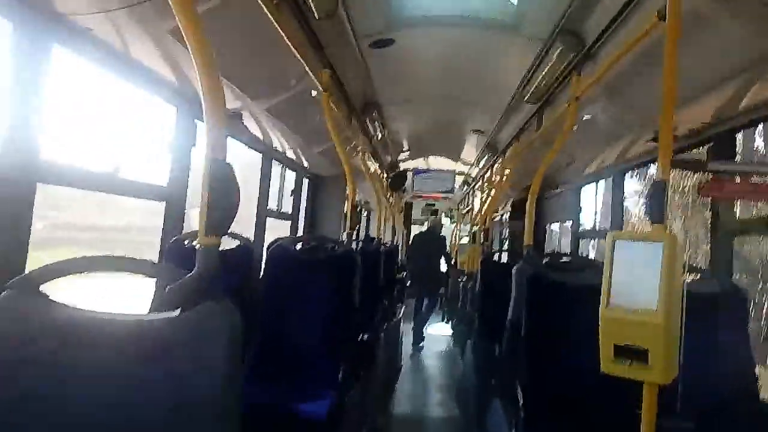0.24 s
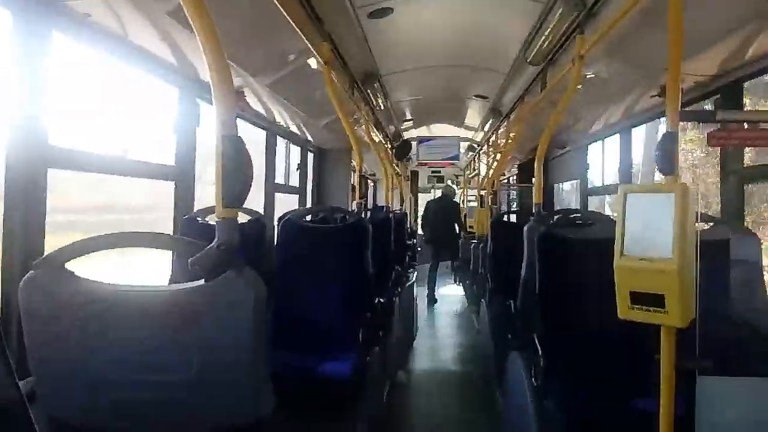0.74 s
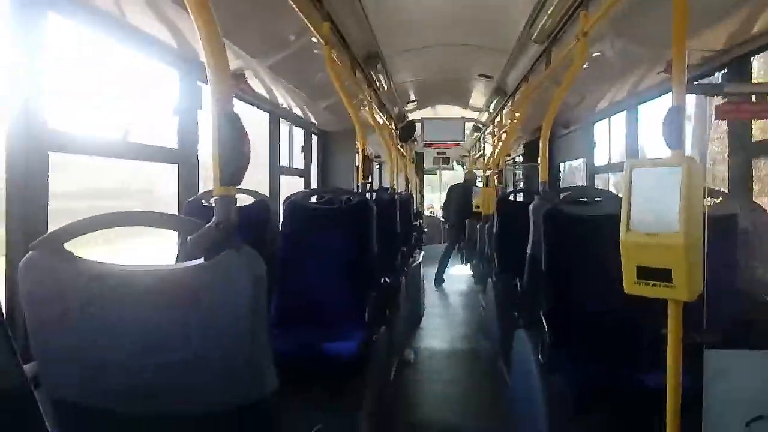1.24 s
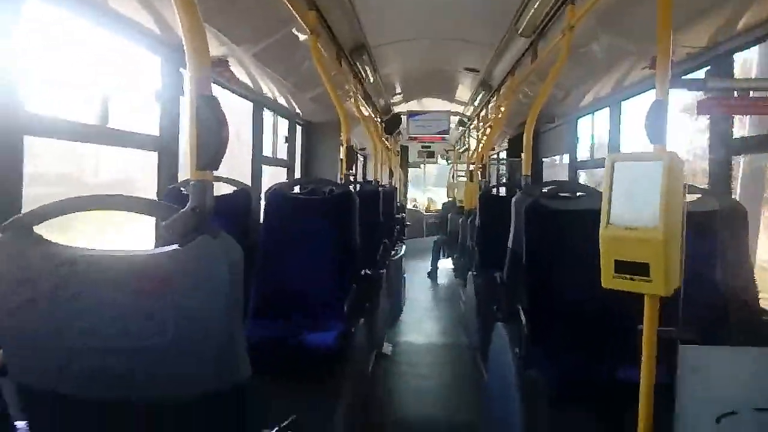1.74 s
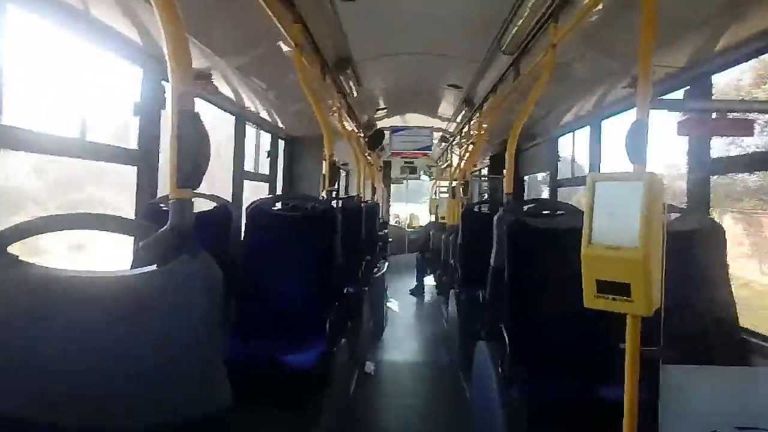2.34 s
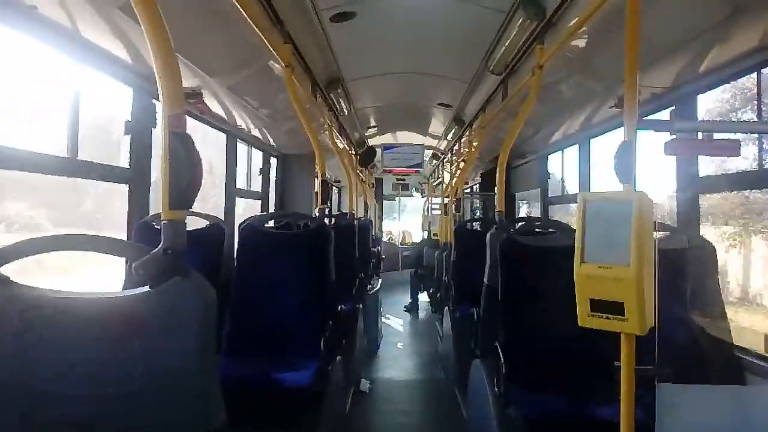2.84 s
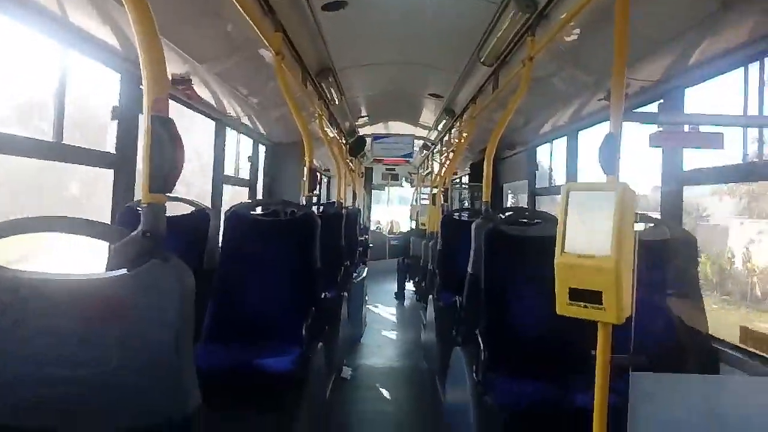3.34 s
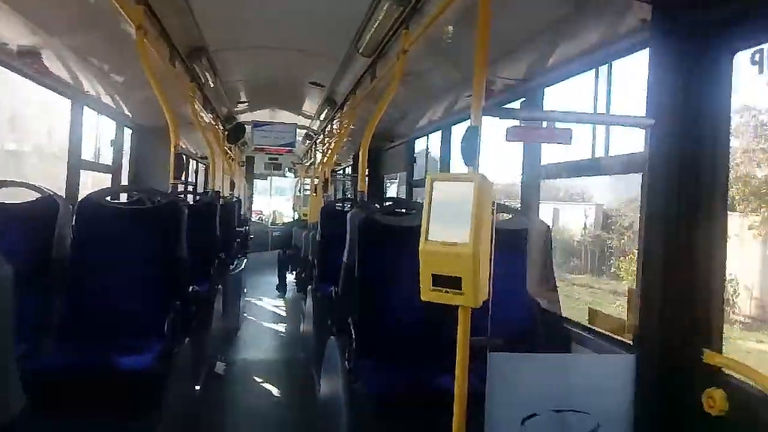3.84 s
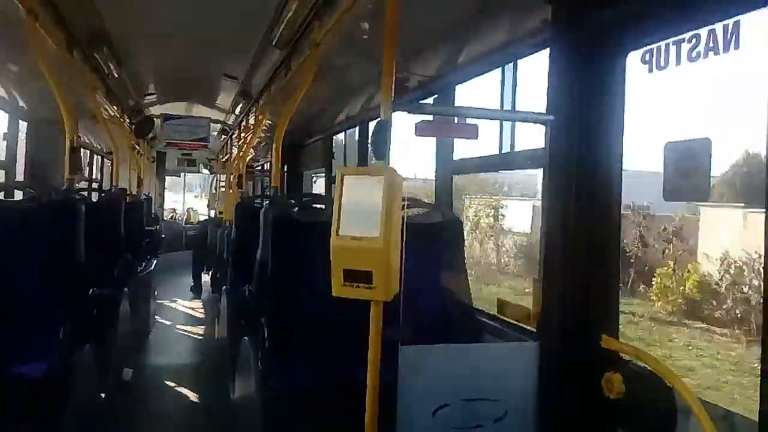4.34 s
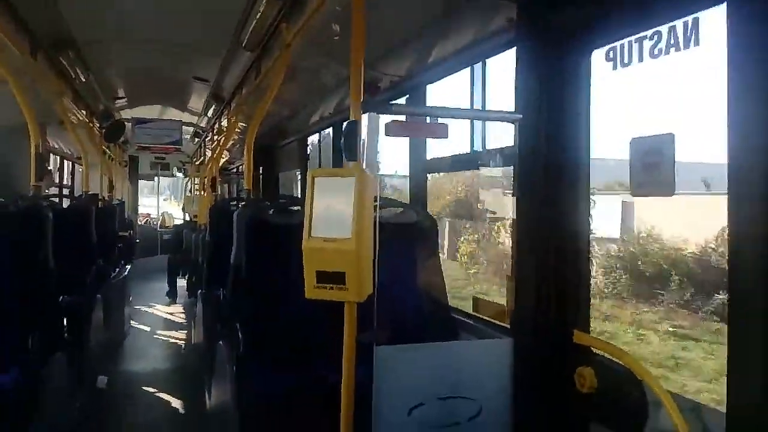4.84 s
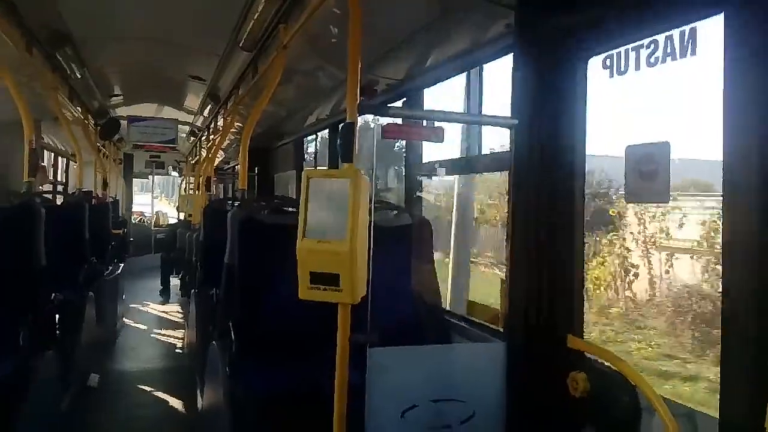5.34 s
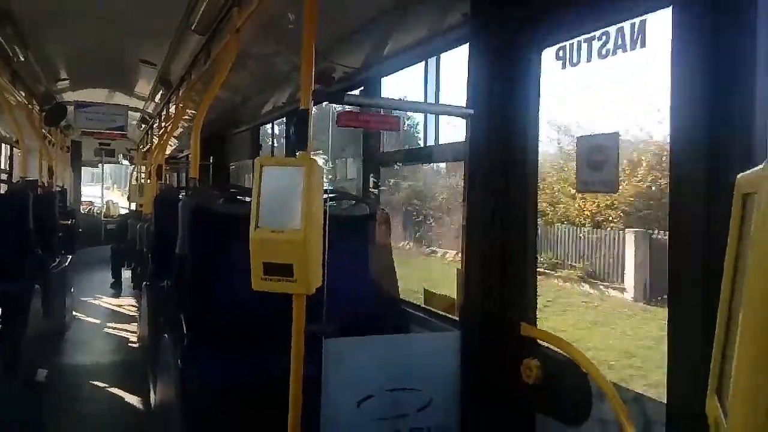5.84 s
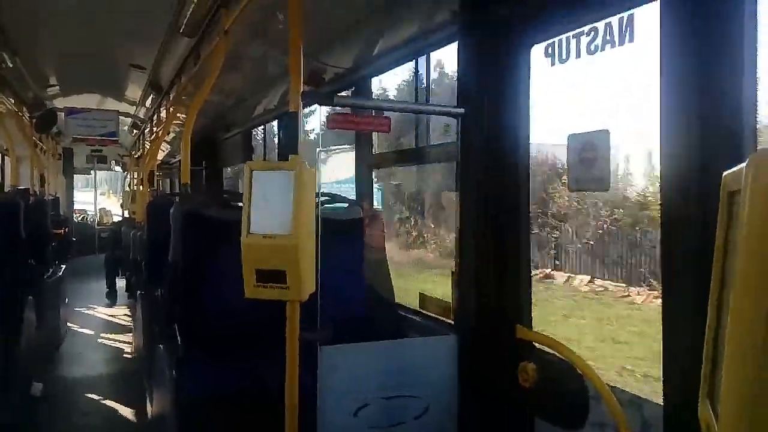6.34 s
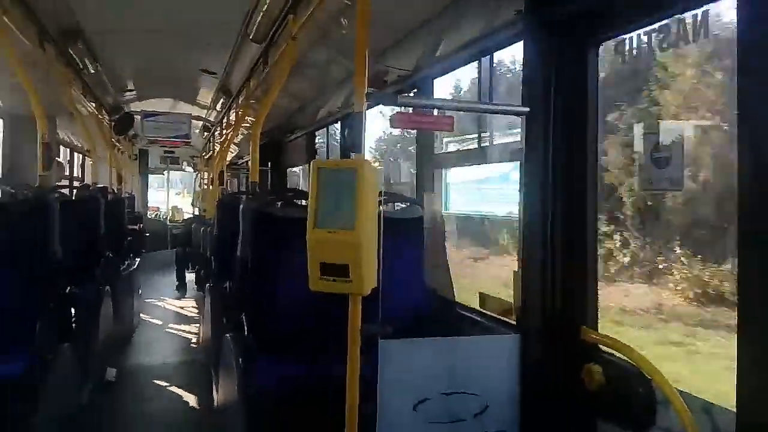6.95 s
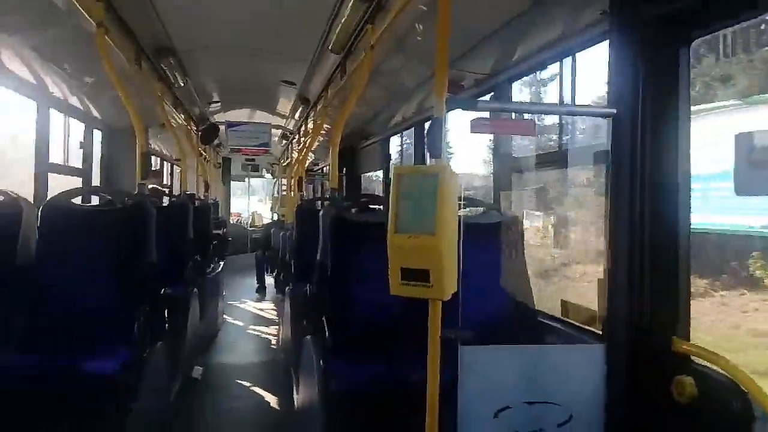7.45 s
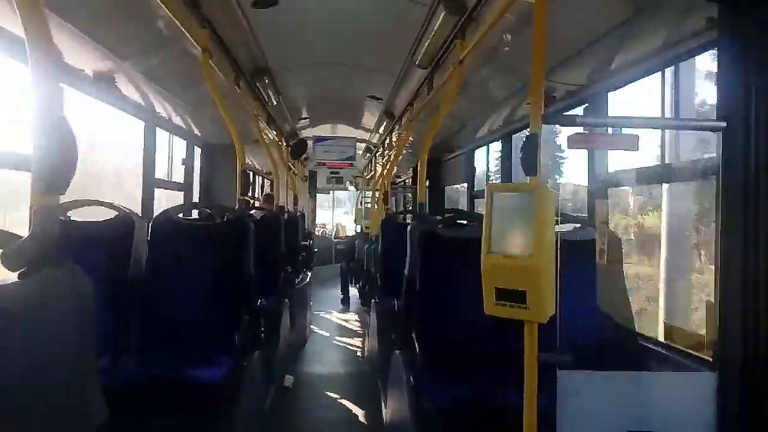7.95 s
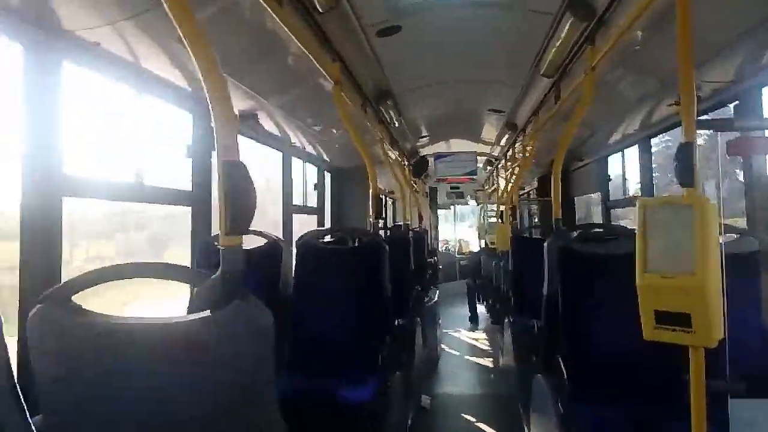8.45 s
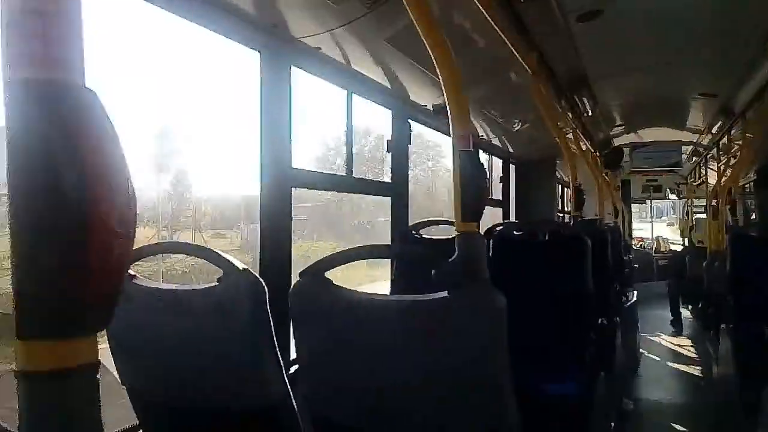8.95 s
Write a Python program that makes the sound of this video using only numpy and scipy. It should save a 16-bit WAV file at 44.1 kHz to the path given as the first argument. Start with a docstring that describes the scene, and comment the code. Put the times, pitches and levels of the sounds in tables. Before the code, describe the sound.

Interior of a nearly empty electric bus, heard in stereo from a rear seat. From 0 to 2 s, low thuds, loose panel rattles and road bumps come close together, with sharp airy valve puffs, strongest around 0.5 s. From about 1.1 s a low gear whine swells to dominate by 1.4 s: two close tones beating roughly, rising from about 140 Hz towards 300 Hz, fast until about 5 s, then slowly. Thinner overtones climb with it, wavering between 3 and 5 s. Low body drumming, tyre and wind roar, and weak blower and pump tones run throughout. A short puff comes at 3.3 s. A faint door-seal hiss increases from 4.3 to 7.6 s; a low hum swells near 5.7 and 6.5 s. A small rattle occurs at 6.4 s, a bump at 7.5 s, then thuds and jolts after 8.3 s as the whine continues to the end at 9.2 s.

```python
"""Inside an electric bus that gathers speed.
In the first two seconds thuds, jolts, road bumps and valve puffs crowd together. From about 1.1 s the whine
of two gear meshes, sines at 9 and 10 times the shaft rate, comes up, beats and climbs; some overtones waver
in pitch from 3 to 5 s. A door seal hisses louder from 4.3 to 7.6 s and bumps return after 8.3 s.
Throughout, shaped noise makes body drumming and tyre and wind roar; blower and pump tones are sines."""
import sys
import numpy as np
from scipy import signal
from scipy.fft import rfft, irfft, next_fast_len
from scipy.io import wavfile
from scipy.ndimage import uniform_filter1d, map_coordinates

SR = 44100
rng = np.random.default_rng(int(sys.argv[2]) if len(sys.argv) > 2 else 0)


def to_wav(s):
    """Save 16-bit WAV."""
    ch = np.atleast_2d(s).T  # columns
    pcm = np.round(np.clip(ch, -1, 1) * 32767)  # PCM
    wavfile.write(sys.argv[1], SR, pcm.astype(np.int16))


N = 405135

# drive shaft speed: (time [s], rate [turns/s])
SHAFT_RATE = [(0.0, 11.67), (0.8, 13.89), (1.5, 15.61), (2.1, 17.51), (2.7, 19.24), (3.3, 21.47),
              (3.9, 23.49), (4.5, 25.44), (4.8, 26.21), (5.1, 27.13), (5.7, 28.46), (6.0, 29.01),
              (6.3, 29.36), (7.5, 31.0), (8.4, 32.11), (9.19, 33.03)]
# torque on the gear teeth: (time [s], mesh level [dB])
LOAD = [(0, -24), (1.1, -20), (1.4, 0), (2.4, .5), (3.0, 1.5), (3.5, 1), (4.0, .5), (5.5, 0.6), (6.2, 0),
        (9.19, 0.5)]
# resonances that carry each mesh to the seat:
# (centre [Hz], width [Hz], signed rms left, right at 0 dB load [thousandths of full scale])
MESH_9_PATH = [(140.0, 12.3, -118.3, -127.1), (140.5, 33.0, 111.2, 118.8), (157.3, 2.4, 16.0, 26.0),
               (160.1, 10.8, -38.3, -42.3), (174.6, 6.7, 140.1, 154.9), (181.1, 3.3, -50.1, -46.8),
               (184.2, 2.4, 26.4, 15.7), (189.2, 6.4, 46.8, 44.4), (194.3, 4.0, 31.6, 66.3),
               (204.1, 6.2, -22.5, -27.5), (215.0, 2.4, 11.5, 11.2), (219.5, 5.1, 28.3, 31.2),
               (223.5, 3.8, 8.4, 8.9), (227.5, 3.2, 22.6, 13.2), (237.8, 3.2, 6.5, 2.1),
               (246.6, 4.6, 20.7, 13.0), (253.5, 9.8, 58.1, 57.7), (261.2, 3.5, -22.8, -27.5),
               (269.0, 3.0, 3.9, -11.8), (271.8, 4.7, 54.5, 20.5), (273.9, 6.9, 31.1, 48.9),
               (280.6, 2.8, -19.8, -9.7), (289.0, 5.6, 0.7, 3.0), (292.4, 2.8, -19.8, -13.3),
               (314.3, 29.3, 96.0, 115.8)]
MESH_10_PATH = [(161.1, 3.2, 1.7, 5.1), (167.6, 5.6, -26.1, -26.1), (181.6, 5.6, -20.9, -21.6),
                (194.0, 6.8, -38.8, -53.3), (200.1, 5.2, -13.9, -28.4), (203.6, 11.7, 88.1, 119.1),
                (217.5, 7.8, -59.5, -81.3), (224.9, 3.3, 25.6, 36.0), (232.4, 7.7, -34.4, -39.0),
                (237.9, 5.5, 21.7, 23.0), (243.8, 7.1, -30.6, -22.0), (254.2, 5.8, 9.6, -2.4),
                (257.6, 17.8, -28.2, -30.3), (275.1, 7.7, -39.9, -41.6), (279.4, 5.2, -40.9, -53.0),
                (294.6, 10.6, -50.8, -80.5), (303.6, 6.4, 25.1, 18.9), (309.6, 11.0, -8.9, -37.5),
                (316.9, 33.0, 88.8, 101.0), (318.0, 6.8, 16.1, -24.1), (325.7, 11.1, -72.0, -63.2)]
MESH_10_LEAD_CYCLES = .288   # places the beat on the shaft turn
MESH_FLUTTER_DB = .5
# overtones of the drive: [multiples of the shaft rate]
OVERTONE_ORDERS = (15, 18, 20, 27, 30, 31.5, 36)
# resonances that carry each overtone, in that order: (centre [Hz], -6 dB width [Hz], top rms [dB], L-R [dB])
OVERTONE_PATHS = [
    [(286, 12, -39, -2), (387, 20, -36.5, -1.5), (403, 20, -41, -2), (426.5, 20, -40.5, -2.5),
     (455.7, 8.5, -40.5, -10), (483.3, 16, -38, -2.5), (495, 4.8, -33.5, 2)],
    [(288, 12, -40, -1.5), (515, 36, -40.5, -0.5), (500, 18, -50.5, -0.5), (550.5, 23, -40, -2.5),
     (586, 9.1, -43.5, -6.5)],
    [(313, 27, -45.5, 4), (385, 17, -53, -3.5), (410, 50, -47.5, -0.5), (490, 18, -49, -5),
     (597, 17, -48.5, -3.5), (634.5, 31, -40.5, 2)],
    [(600, 26, -42.5, -4), (635, 63, -44.5, 1.5), (695, 32, -42.5, -1.5), (722, 6.3, -35, -2.5),
     (783, 12, -40.5, 3.5), (852, 49, -43.5, 1)],
    [(508, 35, -43.5, 0), (565, 55, -42.5, 1.5), (640, 20, -43, -3), (694, 24, -41.5, 3),
     (726, 22, -45, 1.5), (825, 16, -46.5, -3.5), (917, 16, -47, -5.5)],
    [(520, 77, -54, -3.5)],
    [(530, 21, -56, -1.5), (746, 30, -47, 0), (840, 54, -43, 2), (965, 17, -47, -1.5)],
]
OVERTONE_LAG_MS, OVERTONE_FLUTTER_DB_PER_ORDER = 0.14, 0.1141
# pitch waver of the first mesh's overtones under hard pull: (time [s], spread at order 27 [share of pitch])
OVERTONE_WAVER = [(0, .002), (3, .003), (3.4, .018), (4.6, .016), (5.2, .006), (5.9, .001), (9.19, .001)]

# single dull thuds through the floor: (time [s], starting amplitude [dB], pitch [Hz])
THUDS = [(0.261, -18, 111), (.352, -20, 330), (.395, -18, 220), (0.477, -8, 95), (.652, -15, 201),
         (.698, -13, 220), (.78, -20, 90), (.9, -23, 110), (1.045, -15, 170), (1.105, -23, 121),
         (1.204, -18, 170), (1.236, -15, 110), (1.611, -12, 80), (1.661, -13, 90), (7.515, -19, 120),
         (8.43, -19, 120), (8.528, -15.5, 140)]
THUD_CYCLES_PER_20_DB = 1.9

# road roughness between bumps: (time [s], drumming [dB])
ROAD = [(0, -33.5), (1.3, -34), (2.2, -32.5), (2.8, -46.5), (3.4, -33), (4, -38), (5, -33), (5.8, -36),
        (6.5, -35.5), (7.2, -34), (8, -33.5), (8.8, -44.5), (9.19, -26.5)]
# drumming spectrum: (frequency [Hz], density [dB per Hz])
DRUMMING_SPECTRUM = [(8.8, -37), (15, -6.5), (40, 0.5), (60, 6.5), (167, -2), (222, -3.5), (261, -4.5),
                     (448, -17), (499, -37), (576, -14), (665, -22.5), (728, -28), (1100, -30.5),
                     (1430, -59), (2420, -120)]
# body panel resonances: (centre [Hz], width [Hz], boost [dB])
BODY_MODES = [(68.6, 7, 3), (101.8, 2, 6.5), (164, 12, 4.5), (192, 41, 4), (222.6, 13, 7), (293, 60, 4)]
# bumps in the road: (time [s], drumming [dB], hold [s], brightness [dB])
BUMPS = [(0, -20, 0.07, 0), (0.28, -23, 0.15, 5), (0.398, -26.5, 0.17, -6), (0.571, -26, 0.12, 6),
         (0.736, -25.5, 0.19, -2.5), (1.008, -26, 0.028, 2.5), (1.109, -22, 0.083, 4.5),
         (1.295, -32, 0.029, -7), (1.612, -27, 0.063, -9), (1.846, -24, 0.11, -3.5),
         (1.99, -30.5, 0.085, -11), (2.127, -29, 0.026, -10), (2.247, -31, 0.072, -2),
         (2.558, -31.5, 0.049, -11), (2.73, -34, 0.034, -4), (2.97, -31, 0.051, -17),
         (4.13, -36, 0.035, 9.5), (4.68, -43, .03, -3), (5.13, -37.5, 0.038, 14.5), (5.607, -35, 0.033, 7),
         (7.498, -33.5, 0.076, -9), (8.39, -28, 0.044, -14), (8.5, -25.5, 0.11, 3.5), (8.66, -31, 0.1, 4),
         (8.95, -34.5, .05, -6)]
BUMP_RISE_S, BUMP_T60_S = 0.017, 0.4
ROAD_FLUTTER_DB, ROAD_BRIGHT_DB = 1.5, 1

# hard jolts that rattle the panels: (time [s], drive level [dB], length [s], brightness [dB per octave])
JOLTS = [(.3, -24, 0.11, 1.5), (.61, -34, 0.015, -21), (1.09, -25, .14, -4.5), (1.86, -36, 0.094, 2),
         (6.37, -40.5, 0.08, 2.5), (8.40, -37, 0.11, -12), (8.98, -36.5, 0.11, 0.5)]
# ringing panel modes: (pitch [Hz], relative level [dB], t60 [s])
RATTLE_MODES = [(172.4, -4.5, 0.16), (228.6, 3, 0.18), (318, -9, 0.37), (371, -4, 0.32), (445, 0, 0.085),
                (572, -5.5, 0.1), (746, -7, 0.11), (897, -8.5, 0.066)]

# tyre and wind roar: (time [s], base level [dB], treble relative to base [dB])
ROAR = [(0, -36, -5.5), (.25, -35, -8.5), (.6, -35.5, -7), (1.15, -37.5, -5), (1.5, -36.5, -6.5),
        (2.8, -37, -9), (3.4, -36.5, -8.5), (4, -36.5, -9.5), (5.3, -36, -10.5), (5.65, -33.5, -11),
        (6.4, -34, -10), (6.9, -37, -10.5), (8, -34.5, -10.5), (9.19, -36, -9.5)]
# roar spectra, low part and treble: (frequency [Hz], density [dB per Hz])
ROAR_LOW_SPECTRUM = [(190, -25), (330, 1.5), (415, -5), (505, -5.5), (679, -3.5), (953, -9.5), (1020, -6.5),
                     (1160, -8.5), (1560, -12), (1680, -10.5), (4500, -26), (5850, -55), (9900, -120)]
ROAR_TREBLE_SPECTRUM = [(1470, -14.5), (2500, -9), (2620, -4), (3410, -3), (3890, -8.5), (5120, -4),
                        (5360, -3.5), (6360, -10), (7710, -32), (10000, -57.5), (17000, -120)]
# cabin resonances: (centre [Hz], width [Hz], boost [dB])
CABIN_MODES = [(474.4, 16, 8), (795, 53, 2.5), (900, 130, 5.5), (1212, 11, 9.5), (1687, 19, 7),
               (2090, 950, 5)]
# steady drone under the floor: (frequency [Hz], density [dB per Hz])
DRONE_SPECTRUM = [(25, -4), (60, -4), (150, -3), (250, -4.5), (380, -12.5), (420, -23), (700, -41.5)]
DRONE_DB = -36

# blower and pump hum: (pitch [Hz], mean level [dB rms], pitch width [Hz], L-R [dB])
HUM = [(300, -43.5, 4.32, -1), (322.8, -46, .3, 5), (364.5, -44.5, 4.1, 4.5)]
# pitches of the three pump tones [Hz]
PUMP_HZ = (145.5, 739, 968)
# their mean strength: (time [s], first [dB rms], second [dB rms], third [dB rms])
PUMP_LEVELS = [(0, -38.5, -47, -48.5), (2, -37.5, -49, -46.5), (3.2, -40.5, -49.5, -47.5),
               (4.4, -39.5, -48, -48.5), (5, -47, -48, -42), (5.7, -51, -59, -47), (6.1, -47, -57.5, -54.5),
               (7.2, -42.5, -52, -48.5), (8, -39.5, -54.5, -47.5), (9.19, -39, -47, -53)]
PUMP_PAN_DB, PUMP_WAVER_HZ, PUMP_FLUTTER_DB = (0, -1.2, 2), .7, 2.2
# low hum that comes and goes: (middle [s], half length [s], pitch [Hz], level [dB rms])
MOAN = [(4, 0.35, 101.5, -41), (5.742, 0.47, 99, -36), (6.552, 0.11, 100.9, -31.5),
        (7.195, 0.12, 99.6, -41)]

# air valve puffs:
# (time [s], level [dB], rise [s], hold [s], t60 [s], centre [Hz], width [Hz], L-R [dB])
PUFFS = [(0.088, -41, 0.016, .02, 0.19, 5130, 3500, -2),
         (0.422, -36.5, 0.0059, 0.011, 0.24, 4760, 5000, -2),
         (0.498, -37.5, 0.0042, .01, 0.18, 4400, 4470, -5),
         (0.499, -36.5, 0.019, 0.056, 0.54, 2240, 500, 1),
         (0.534, -30.5, 0.02, 0.034, 0.47, 5190, 1500, -8), (0.536, -38, 0.025, 0.027, 0.36, 6420, 695, 0),
         (0.548, -35, 0.021, 0.034, 0.51, 3850, 800, 0), (0.924, -43, 0.012, .02, .3, 5500, 3500, -1),
         (1.067, -46, 0.014, .02, .2, 5200, 3500, 2), (1.201, -36.5, 0.006, 0.022, 0.14, 5100, 1500, -5),
         (1.963, -42, 0.016, 0.017, 0.22, 5660, 3000, -3), (3.254, -40.5, .006, .025, .15, 2380, 600, 5),
         (6.771, -39.5, .006, 0.008, 0.09, 4450, 300, -3), (8.343, -53, .004, 0.0036, 0.093, 5000, 3000, 0),
         (8.678, -46, 0.014, .03, 0.28, 5500, 2980, -2)]
PUFF_SPUTTER_DB = 1.5
# air past a door seal, heard from its side as the listener turns: (time [s], level [dB], left lag [ms])
DOOR_LEAK = [(0, -54, -.02), (3.8, -54, -.02), (4.3, -49, .4), (7.6, -49, .41), (8.2, -55, 0),
             (9.19, -56, -.15)]
LEAK_BAND_HZ = (1700, 4700)

TOP_NOISE_LEVEL = [(0, -78.5), (2.3, -82), (2.8, -87), (8.2, -88.5), (8.7, -82.5), (9.19, -87)]
# its spectrum: (frequency [Hz], density [dB per Hz])
TOP_NOISE_SPECTRUM = [(7000, -31.5), (8000, -3.5), (8700, -12), (9300, -7), (10300, -5.5), (12000, -8),
                      (14000, -11), (15000, -16.5), (16000, -44)]
TOP_NOISE_WANDER_DB, TOP_NOISE_UNDER_PUFFS_DB = 2.5, -41

# stereo noise likeness: (frequency [Hz], left-right correlation [-1..1])
LIKENESS = [(60, 0.94), (120, 0.9), (240, 1), (470, 0.66), (930, 0.22), (1840, -0.062), (3660, 0.075),
            (7260, -0.00044)]
# stereo noise balance: (frequency [Hz], L-R [dB])
BALANCE = [(60, -0.5), (100, 3), (170, -2), (300, -1), (510, -1), (860, -2), (1470, 1), (2500, 1),
           (4260, -5), (7260, -5), (9000, 5.5)]
AIR_TOP_HZ, CUTOFF_HZ = 8400, 15140


def from_db(db):
    """Decibels to gain."""
    return 10 ** (np.asarray(db) / 20)


def in_time(rows):
    """Every column of a timed table, sample by sample."""
    times_s, *columns = np.transpose(rows)
    return [np.interp(np.arange(N) / SR, times_s, column) for column in columns]


def at_hz(points, hz):
    """A (frequency, value) table read on a log-frequency axis."""
    table_hz, values = np.transpose(points)
    return np.interp(np.log(hz), np.log(table_hz + 1e-9), values)


def pan(db):
    """Left and right gains for a level difference."""
    return from_db(np.outer([.5, -.5], db))


def drift(rate_hz):
    """Slow chance of spread 1: noise through two equal poles, run at SR / 40."""
    pole = np.exp(-2 * np.pi * rate_hz * 40 / SR)
    noise = rng.standard_normal(N // 40 + 2002)
    slow = signal.lfilter([1], [1, -2 * pole, pole * pole], noise)[2000:]   # skip the settling
    return np.interp(np.arange(N) / 40, np.arange(len(slow)), slow / slow.std())


def field(spectrum, modes=()):
    """Stereo noise with a spectrum, raised at resonances, alike in the bass; mid rms 1."""
    size = next_fast_len(N)
    hz = np.maximum(np.arange(size // 2 + 1) * SR / size, 1)
    db = at_hz(spectrum, hz)
    for centre_hz, width_hz, boost_db in modes:
        db = db + boost_db / (1 + (2 * (hz - centre_hz) / width_hz) ** 2)
    mid, side = rfft(rng.standard_normal((2, size)))
    alike = np.clip(at_hz(LIKENESS, hz), -.99, .99)
    both = np.sqrt(1 + alike) * mid + np.sqrt(1 - alike) * side * [[1], [-1]]
    both = both * pan(at_hz(BALANCE, hz)) * from_db(db)
    out = irfft(both, size)[:, :N]
    return out / out.mean(axis=0).std()


def tone(hz, db, pan_db=0, lag_ms=0):
    """A sine of given rms level that reaches the left port late by the lag."""
    phase = 2 * np.pi * (np.cumsum(hz) / SR + rng.random())
    late = 2 * np.pi * hz * lag_ms / 1000
    return np.sqrt(2) * from_db(db) * pan(pan_db) * np.sin([phase - late / 2, phase + late / 2])


def envelope(s, db, rise_s, hold_s, t60_s):
    """Quick rise, hold, fading tail."""
    out, at = np.zeros(N + SR), max(int(s * SR), 0)
    t = (at + np.arange(SR)) / SR - s
    fade_db = 60 * np.maximum(t - rise_s - hold_s, 0) / t60_s
    out[at:at + SR] = np.clip(t / rise_s, 0, 1) * from_db(db - fade_db)
    return out[:N]


def drive():
    """Lines follow multiples of the shaft rate and glide together; orders 18, 27 and 36 also waver."""
    shaft = uniform_filter1d(in_time(SHAFT_RATE)[0], size=9000, mode="nearest")   # inertia rounds the corners
    out = mesh(9, MESH_9_PATH, shaft, 0) + mesh(10, MESH_10_PATH, shaft, MESH_10_LEAD_CYCLES)
    for order, path in zip(OVERTONE_ORDERS, OVERTONE_PATHS):
        hz = order * shaft
        db, pan_db = through(path, hz)
        of_first_mesh = order % 9 == 0
        wobble = 1 + of_first_mesh * in_time(OVERTONE_WAVER)[0] * order / 27 * drift(14.0)
        # shorter waves form a finer standing pattern, so strength and phase wander more
        flutter_db = OVERTONE_FLUTTER_DB_PER_ORDER * order * np.minimum(drift(9.4), 1.2)
        out += tone(hz * wobble, db + flutter_db, pan_db, OVERTONE_LAG_MS * drift(0.86))
    return out


def mesh(order, path, shaft, lead_cycles):
    """A gear tone locked to the shaft; modes add with their signs, so it fades and turns over between them."""
    steps = np.arange(0, N, 100)
    centre_hz, width_hz, *ports = np.transpose(path)
    detuning = (order * shaft[steps] - centre_hz[:, None]) / width_hz[:, None]
    carried = np.array(ports) @ (1 / (1 + 2j * detuning)) / 1000   # thousandths to full scale
    carried = np.array([np.interp(np.arange(N), steps, port) for port in carried])
    angle = 2 * np.pi * (order * np.cumsum(shaft) / SR + lead_cycles)
    strength = from_db(in_time(LOAD)[0] + MESH_FLUTTER_DB * drift(8.0))
    return np.sqrt(2) * strength * (carried * np.exp(1j * angle)).real


def through(path, hz):
    """Level and side of a gliding tone; the powers of the resonances it passes add."""
    steps = np.arange(0, N, 100)
    power = 0
    for centre_hz, width_hz, db, pan_db in path:
        skirt = (1 + (2 * (hz[steps] - centre_hz) / width_hz) ** 2) ** 2
        power = power + from_db(2 * db) * pan(2 * pan_db) / skirt
    left_db, right_db = (np.interp(np.arange(N), steps, 10 * np.log10(p)) for p in power)
    return (left_db + right_db) / 2, left_db - right_db


def thuds():
    """Each blow sets the floor ringing for a few cycles."""
    out, t = np.zeros(N + SR), np.arange(SR // 4) / SR
    for s, db, hz in THUDS:
        decay = from_db(db - 20 * t * hz / THUD_CYCLES_PER_20_DB)
        out[int(s * SR):][:len(t)] += decay * np.sin(2 * np.pi * hz * t)
    return out[:N]


def body():
    """Panels drum with the road; bright bumps also reach their upper modes."""
    drum = field(DRUMMING_SPECTRUM, BODY_MODES)
    upper = signal.sosfilt(signal.butter(2, 170, "high", fs=SR, output="sos"), drum)
    low = from_db(in_time(ROAD)[0] + ROAD_FLUTTER_DB * drift(9.1))
    high = low * from_db(ROAD_BRIGHT_DB + 1.5 * drift(6.1))
    for s, db, hold_s, bright_db in BUMPS:
        shape = envelope(s - BUMP_RISE_S, db, BUMP_RISE_S, hold_s, BUMP_T60_S)
        low = np.hypot(low, shape)
        high = np.hypot(high, shape * from_db(bright_db))
    return from_db(0.83 * drift(25)) * (low * drum + (high - low) * upper)


def jolts():
    """A short run of uneven knocks swells, fades and rings the panel modes."""
    out = np.zeros(N)
    knocks = rng.standard_normal((len(JOLTS), len(RATTLE_MODES), 24))
    moments = rng.random((len(JOLTS), 24))   # share of the jolt's length
    for k, (hz, level_db, t60_s) in enumerate(RATTLE_MODES):
        clicks = np.full(N, 1e-18)
        octaves = np.log2(hz / RATTLE_MODES[0][0])
        for j, (s, db, length_s, tilt_db) in enumerate(JOLTS):
            at = ((s + length_s * moments[j]) * SR).astype(int)
            gain = from_db(db + level_db - 4.5 + tilt_db * octaves)
            clicks[at] += knocks[j, k] * np.sin(np.pi * moments[j]) ** 2 * gain
        r, w = from_db(-60 / (t60_s * SR)), 2 * np.pi * hz / SR
        out += signal.lfilter([0, np.sin(w)], [1, -2 * r * np.cos(w), r * r], clicks)
    return out


def roar():
    """Tyres and airflow, coloured by the cabin, with a hissing top and a drone under the floor."""
    level_db, treble_db = in_time(ROAR)
    low = from_db(level_db + 0.67 + 0.5 * drift(11.0)) * field(ROAR_LOW_SPECTRUM, CABIN_MODES)
    top = from_db(level_db + treble_db + .8 * drift(12.0)) * field(ROAR_TREBLE_SPECTRUM)
    drone = from_db(DRONE_DB + 0.28 * drift(4.1)) * field(DRONE_SPECTRUM, BODY_MODES)
    return low + top + drone


def hum():
    """Steady machine tones, wavering a little in pitch and strength, and a low hum in swells."""
    out = np.zeros((2, N))
    for hz, db, width_hz, pan_db in HUM:
        out += tone(hz + width_hz * drift(3.33) / 2, db + 3.4 * drift(3.6), pan_db, 0.4 * drift(0.96))
    for hz, db, pan_db in zip(PUMP_HZ, in_time(PUMP_LEVELS), PUMP_PAN_DB):
        pitch_hz = hz + PUMP_WAVER_HZ * drift(1.41)
        out += tone(pitch_hz, db + PUMP_FLUTTER_DB * drift(4.3), pan_db, 0.15 * drift(0.31))
    t = np.arange(N) / SR
    middle_s, _, moan_hz, _ = np.transpose(MOAN)
    swell = sum(from_db(db) * np.exp(-((t - s) / half_s) ** 2) for s, half_s, _, db in MOAN)
    return out + swell * tone(np.interp(t, middle_s, moan_hz), 0, 2)


def valves():
    """Short jets of air: noise in one broad resonance, quick rise, fading tail."""
    out, t = np.zeros((2, N)), np.arange(SR) / SR
    jets = rng.standard_normal((len(PUFFS), 2, SR))
    for jet, (s, db, rise_s, hold_s, t60_s, hz, width_hz, pan_db) in zip(jets, PUFFS):
        nozzle = signal.iirpeak(hz, hz / width_hz, SR)
        jet = signal.lfilter(*nozzle, signal.lfilter(*nozzle, jet))
        fade_db = 60 * np.maximum(t - rise_s - hold_s, 0) / t60_s
        shape = np.minimum(t / rise_s, 1) * from_db(db - fade_db)
        shape = shape * from_db(PUFF_SPUTTER_DB * drift(45.0)[:SR])   # the jet sputters
        at = int(s * SR)
        out[:, at:at + SR] += (jet / jet.std() * shape * pan(pan_db))[:, :N - at]
    return out


def door_leak():
    """One hiss from one direction: the same sound at both ports, shifted in time."""
    db, lag_ms = in_time(DOOR_LEAK)
    band = signal.butter(2, LEAK_BAND_HZ, "band", fs=SR, output="sos")
    hiss = signal.sosfilt(band, rng.standard_normal(N))
    late = np.arange(N) - lag_ms * SR / 1000
    left = map_coordinates(hiss, [late], order=3, mode="nearest")
    return from_db(db) * np.array([left, hiss]) / hiss.std()


def top_noise():
    puffing = sum(envelope(*row[:5]) for row in PUFFS) * from_db(TOP_NOISE_UNDER_PUFFS_DB)
    wandering = from_db(in_time(TOP_NOISE_LEVEL)[0] + TOP_NOISE_WANDER_DB * drift(5.8))
    return (puffing + wandering) * field(TOP_NOISE_SPECTRUM)


def scene():
    """Everything heard from a rear seat."""
    air = roar() + jolts() + valves() + door_leak()
    air = signal.sosfilt(signal.cheby2(10, 50, AIR_TOP_HZ, fs=SR, output="sos"), air)
    return drive() + body() + thuds() + hum() + air + top_noise()


def record(dry):
    """A few milliseconds of fade at both ends; the top is cut steeply."""
    from_start = np.arange(N)
    dry = dry * np.minimum(np.minimum(from_start, from_start[::-1]) / (.004 * SR), 1)
    return signal.sosfilt(signal.cheby2(12, 60, CUTOFF_HZ, fs=SR, output="sos"), dry)


dry = scene()
out = record(dry)
to_wav(out)
```